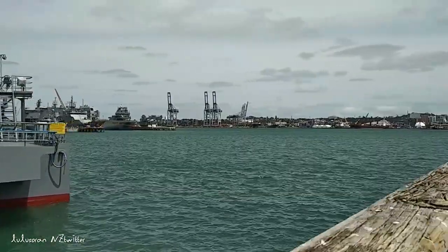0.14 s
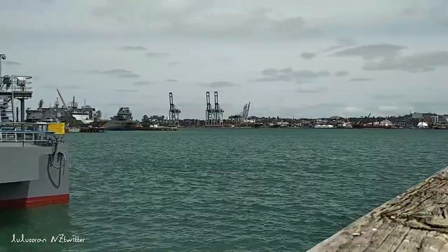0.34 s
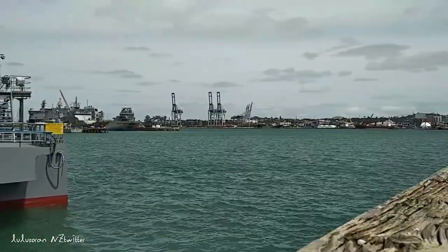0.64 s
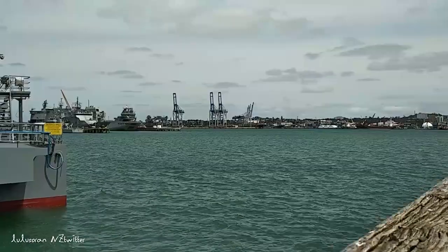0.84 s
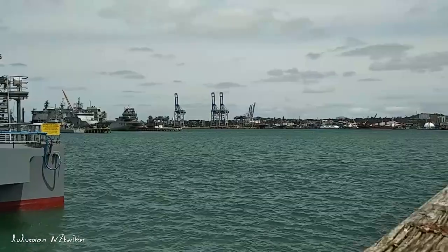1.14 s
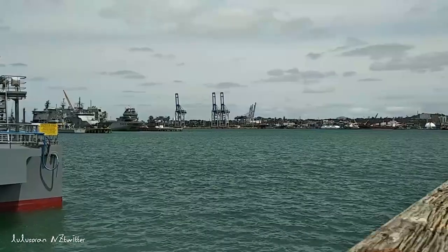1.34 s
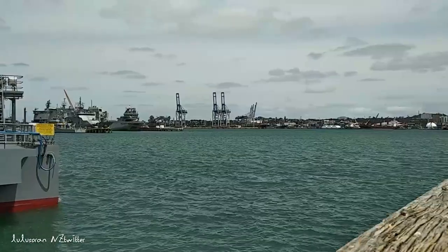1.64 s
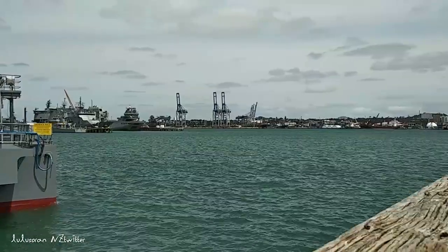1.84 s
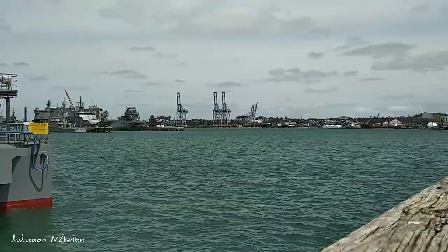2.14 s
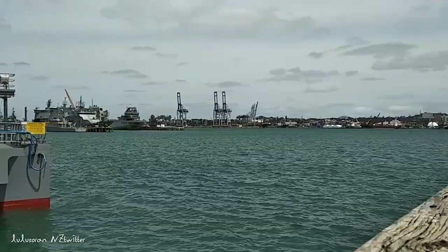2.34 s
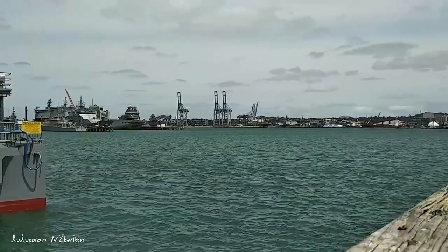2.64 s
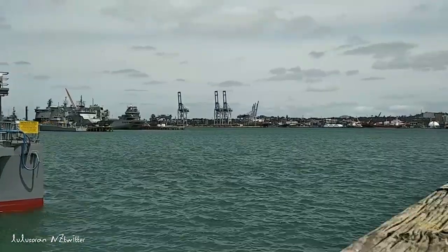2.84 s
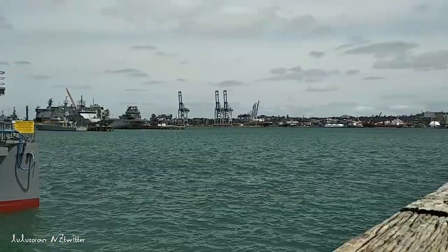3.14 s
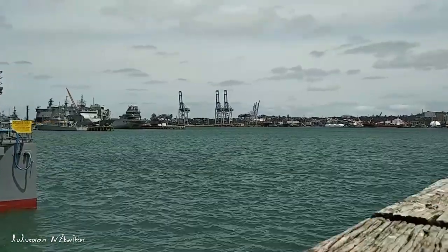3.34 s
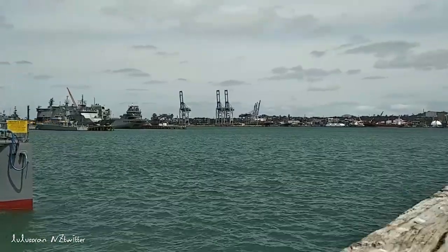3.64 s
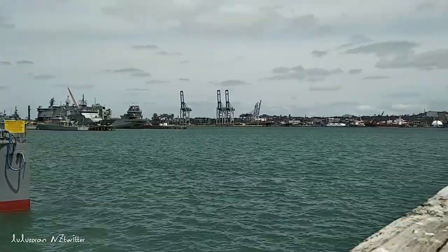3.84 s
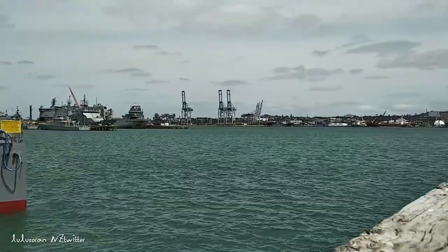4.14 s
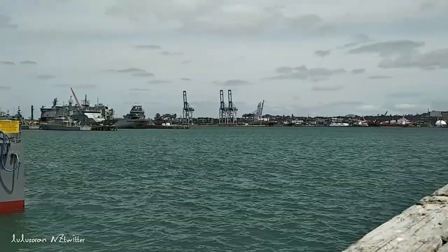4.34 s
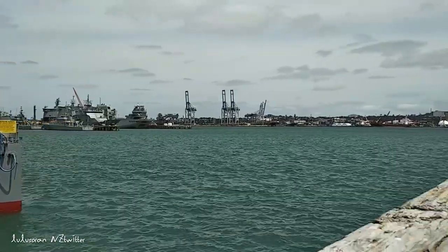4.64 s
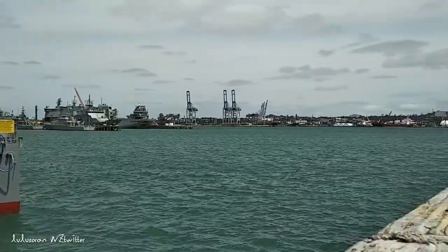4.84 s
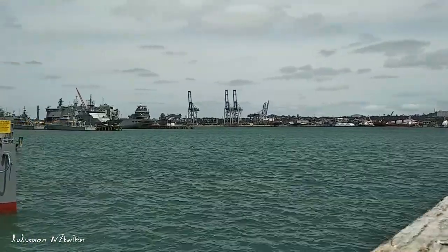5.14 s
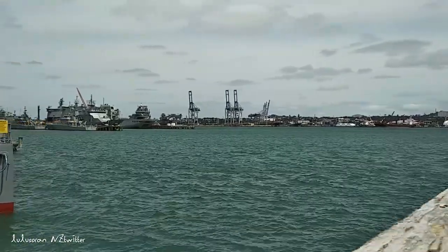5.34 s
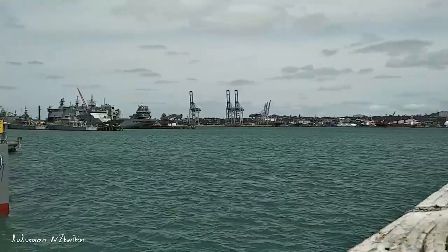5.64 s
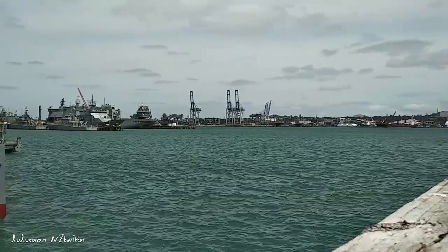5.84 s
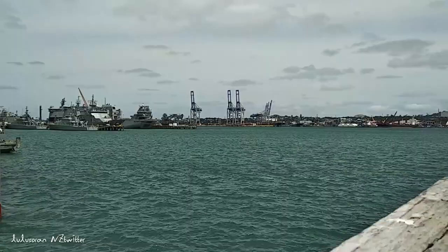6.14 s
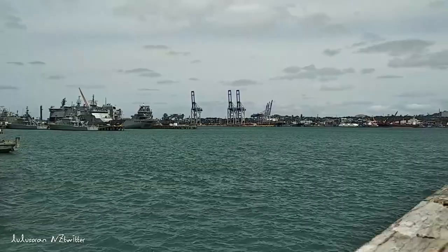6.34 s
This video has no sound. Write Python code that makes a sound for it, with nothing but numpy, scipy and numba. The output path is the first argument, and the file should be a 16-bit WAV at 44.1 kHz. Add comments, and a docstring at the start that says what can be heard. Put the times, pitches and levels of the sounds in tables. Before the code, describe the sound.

Steady, airy water hiss fills a wide outdoor stereo image, swelling slightly now and then. Sparse ticks and splashes come first, with distant sliding whistles beneath. The brightest, loudest slaps arrive past the midpoint, mostly centre to left, frothing briefly afterward. Wood creaks once, hollow water plops and gurgles at far right, and a few clear drips end the scene over unbroken fizz.

```python
"""A fizz of countless bursting bubbles surges now and then and froths after most splashes, as harbour
water laps at a timber wharf. Wavelets knock on the piles, loose water glugs on the right,
timber creaks once, and a far bird whistles. Water sounds are built from single ringing bubbles,
timber from fixed ringing tones, and the bird from sliding sine waves.
A small stereo microphone above the water cuts the bass."""
import sys
import numpy as np
from scipy import signal
from scipy.fft import rfft, irfft, next_fast_len
from scipy.io import wavfile
from scipy.ndimage import map_coordinates
from numba import njit

SR = 44100
rng = np.random.default_rng(int(sys.argv[2]) if len(sys.argv) > 2 else 0)


def volts_from_decibels(level):
    """Turn decibel levels (scalar or array-like) into linear amplitude factors."""
    exponent = np.asarray(level, float) / 20
    return 10 ** exponent


def put_to_file(sound):
    """Save the sound as 16-bit audio at rate SR, in the file named by the first command-line argument."""
    columns = np.atleast_2d(sound).T  # one column per channel
    safe = np.clip(columns, -1, 1)
    whole_steps = np.round(safe * 32767)
    wavfile.write(sys.argv[1], SR, whole_steps.astype(np.int16))


N = 286376  # samples

# Steady fizz, before lean and ripple. Each row: time in seconds, then foam, spray and mist levels in dB.
STEADY_FIZZ = [(0.0, -51, -50.5, -65.5), (0.34, -53.5, -53, -65.5), (2.55, -53.5, -52, -61.5),
               (2.67, -52, -53, -64), (3.61, -53, -52.5, -63.5), (3.76, -51.5, -48.5, -64),
               (3.9, -51.5, -53, -61.5), (4.81, -52, -50.5, -66), (5.28, -54, -54, -67.5),
               (5.75, -51, -49.5, -64), (6.05, -55.5, -54.5, -67.5), (6.49, -51.5, -51.5, -65)]
# Surges that swell and sink. Each row: centre in seconds, half width in seconds, foam dB, spray dB.
SURGES = [(0.135, 0.041, -49.5, -50), (0.553, 0.017, -60, -46.5), (.675, 0.033, -49, -50),
          (2.052, 0.046, -56.5, -47), (2.53, 0.026, -53, -46.5), (3.025, 0.022, -52.5, -51.5),
          (3.28, 0.032, -60, -47), (4.991, 0.028, -52.5, -49.5), (5.831, 0.046, -49, -50.5)]
# Tone of every bubble crowd. Each row: frequency in Hz, gain in dB.
WATER_TONE = [(88, -66), (150, -34), (552, -22), (658, -18.5), (881, -12.5), (1300, -7.5), (1640, -5),
              (2200, 0), (3580, -1), (3870, -1), (4260, -1.5), (5490, -9), (7790, -4.5), (15700, -19)]
# Bubble crowds. Each holds: lowest Hz, highest Hz, bubbles per second,
# cycles a bubble takes to fade by 60 dB, scatter of bubble size in dB.
FOAM = (1050, 5045, 4500, 27.3, 3.2)
SPRAY = (5130, 10650, 6600, 90, 1.4)
MIST = (11000, 15600, 3400, 300, 1.9)  # the finest bubbles
MIXED_BUBBLES = (1800, 13000, 300, 43, 3.2)  # a sparse, faint crowd of mixed pitch beneath the fizz
GURGLE = (370, 1508, 1200, 9.5, 1.1)
GULPS = (90, 269, 500, 5.5, 3.4)
# Soft low gulps under the deck. Each row: start in seconds, level in dB.
GULP_TIMES = [(.053, -73), (.3, -79), (0.519, -70), (.65, -62), (1.06, -76), (1.25, -70), (1.349, -69),
              (1.58, -59), (1.75, -74), (2.21, -71), (2.32, -69), (2.48, -74), (2.89, -70), (3.37, -68),
              (3.61, -64), (4.16, -61), (5.19, -71), (6.0, -71)]
# Splashes, drops and slaps. Each row: time in seconds, relative level in dB, centre in Hz,
# spread in octaves, left minus right in dB.
SPLASHES = [(0.132, -41.5, 4480, 0.19, -10), (0.637, -34, 12700, 0.12, 15.5), (0.64, -39, 2870, 0.16, -1),
            (0.6408, -27, 8000, 0.2, 3.5), (0.9178, -34.5, 7900, 0.1, 2), (0.9436, -34, 4180, 0.086, 1.5),
            (1.2237, -41, 2350, 0.16, 3), (2.254, -36, 9000, 0.089, 16), (2.414, -34, 7520, 0.57, -0.5),
            (2.417, -43, 13400, 0.2, 11), (2.418, -37, 2620, 0.11, 3), (2.507, -32.5, 9000, 0.12, 9),
            (2.549, -36.5, 5080, 0.19, 8), (2.55, -31, 8700, 0.13, 6), (2.6394, -38, 9530, 0.16, 14),
            (2.896, -38.5, 9730, 0.32, 3), (3.128, -34, 8500, 0.41, 0), (3.214, -44.5, 8750, 0.09, 34.5),
            (3.351, -38.5, 8550, 0.18, 7), (3.608, -21, 13200, 0.2, 19), (3.6088, -18.5, 7650, 0.15, 2.5),
            (3.609, -25, 4560, 0.12, 0), (3.61, -36, 2320, 0.18, -1), (3.654, -38, 3060, 0.14, 1),
            (3.757, -38, 11800, 0.21, 13), (3.8446, -31, 8870, 0.15, 10), (3.8537, -33, 11960, 0.34, 15),
            (3.8538, -31, 1920, 0.3, 4), (4.102, -37, 13400, 0.16, 15), (4.1025, -21.5, 8700, 0.18, 12),
            (4.1017, -26.5, 3330, 0.5, 1.5), (4.347, -44, 13550, 0.2, 15.5), (4.348, -28.5, 9070, 0.2, 15),
            (4.3488, -33.5, 1990, 0.26, -19.5), (4.349, -28.5, 3920, 0.27, 10),
            (4.407, -41, 3330, 0.089, 2), (4.602, -48, 1700, 0.34, -6), (4.86, -37.5, 8000, 0.079, 9.5),
            (4.861, -48.5, 1900, 0.18, 2), (5.2728, -39, 8360, 0.06, 10.5), (5.82, -40, 4300, 0.093, -1),
            (5.851, -36, 4300, 0.11, -5), (5.912, -35.5, 4100, 0.13, -2), (6.419, -38.5, 8540, 0.49, 2)]
# Trickles, runs of like-sized bubbles. Each row: start in seconds, end in seconds, level in dB,
# centre in Hz, spread in octaves, left minus right in dB.
TRICKLES = [(0.112, 0.15, -46, 4340, 0.092, 0), (0.114, 0.156, -42, 7260, 0.16, -5),
            (0.661, 0.698, -41, 3570, 0.28, 2), (0.643, .688, -41, 8400, 0.27, 5),
            (3.597, 3.626, -28, 7300, 0.05, 3), (3.6, 3.626, -25.5, 10300, 0.16, 12),
            (3.621, 3.672, -45, 2600, 0.16, 3), (4.165, 4.192, -40, 3100, 0.14, 6),
            (4.237, 4.268, -47, 4030, 0.098, 6), (4.357, 4.436, -46, 4030, 0.46, 2),
            (5.769, 5.889, -38.5, 4200, .07, -1), (5.843, 5.89, -40, 8870, 0.092, 7)]
# Single drops and cracks, one bubble each. Each row: time in seconds, level in dB, pitch in Hz,
# cycles to fade by 60 dB, left minus right in dB.
DROPS = [(.9428, -38, 4000, 30, -4), (2.417, -24, 2800, 8, -2), (2.898, -31, 2150, 30, 8),
         (3.926, -32, 2160, 100, 4), (3.6104, -9.5, 4160, 24, -1), (4.1033, -4.5, 2790, 7.5, 12),
         (4.172, -39, 3100, 40, 6), (4.3495, -19, 1850, 20, 8), (4.3497, -22, 7100, 12, 6),
         (4.738, -29, 4300, 37, -5), (5.799, -31, 2640, 32, -5), (5.818, -28, 3000, 11, -3),
         (5.152, -22, 3940, 24, -7.5), (5.3372, -10.5, 1900, 2.7, -21), (5.381, -24, 1250, 5, -19),
         (5.462, -28, 1200, 5.6, -20), (5.913, -17, 4000, 14, -5), (5.914, -26, 2400, 9.6, -7)]
# Wavelets knocking on the piles. Each row: time in seconds, relative level of the water in dB,
# centre in Hz, level of the ringing timber in dB.
KNOCKS = [(1.224, -54, 625, -71), (1.48, -59, 1210, -71), (2.917, -58.5, 500, -62), (3.854, -44, 950, -43),
          (4.105, -45.5, 1010, -54), (4.347, -39.5, 1046, -45), (4.602, -48, 610, -62),
          (4.86, -51, 620, -64)]
# Tones the piles ring with. Each row: pitch in Hz, level in dB against the ring, time to fade by 60 dB in seconds.
PILE_TONES = [(292, -11, 0.2), (312, -14, .14), (465, -13, .13), (690, -20, 0.12), (1000, -28, 0.09),
              (1260, -28, 0.1)]
# Loose water glugging on the right. Each row: time in seconds, relative level in dB, centre in Hz.
GLUGS = [(5.308, -55, 694), (5.324, -61, 480), (5.336, -46, 900), (5.368, -52, 610), (5.38, -50, 900),
         (5.46, -53.5, 700), (5.478, -55.5, 690), (5.558, -57, 1120), (5.615, -59, 480), (5.676, -58, 1100),
         (5.705, -61.5, 555), (5.746, -57, 630)]
# A short creak of wet timber. It holds: start in seconds, end in seconds, slips per second, base level in dB.
CREAK = (4.644, 4.716, 217, -41)
# Tones of the creak. Each row: pitch in Hz before it sags, relative level in dB, time to fade by 60 dB in seconds.
CREAK_TONES = [(3540, 0, .022), (2290, -5, .02), (1750, -8, .02)]
# Far bird notes. Each row: start in seconds, length in seconds, relative level in dB,
# first pitch in Hz, pitch it slides towards in Hz.
BIRD_NOTES = [(0.18, 0.125, -62, 860, 1350), (0.342, 0.08, -61, 1320, 1295), (0.625, 0.08, -60, 1310, 1400),
              (.7, .065, -62, 1330, 1410), (.755, .165, -67, 1410, 1385), (1.27, 0.082, -72, 1360, 1390)]

EAR_GAP_S = 0.00043  # travel time from one microphone to the other
FIZZ_LEAN_DB = (-0.5, 1, 6)  # left minus right of foam, spray, mist
RIPPLE_DB = 1  # foam, spray and mist liven and calm together by about this much
SURGE_MIST_DB = -11.5  # mist in a surge, against the spray
FROTH_DB, FROTH_S = (-20.5, -24, -39), 0.034  # foam, spray, mist against the splash; time to sink to 1 / e
MIXED_DB, GURGLE_DB, GULP_DB = -67, -69.5, -92  # steady levels
STIR_DB, STIR_S = -11.5, 0.02  # gurgle left by a knock, against it; time to sink to 1 / e
GLUG_GULP_DB, GULP_S = -15, 0.024  # gulps left by a glug, against it; time to sink to 1 / e
# Finer splash bubbles ring for more cycles and fly further ahead: values at 4 kHz, and powers of pitch.
SPLASH_CYCLES, CYCLES_POWER, SPLASH_LEAD, LEAD_POWER = 31.4, 0.53, 0.031, 1.2
SPLASH_T60_S, KNOCK_T60_S, GLUG_T60_S = 0.089, 0.081, 0.06  # time for a burst to thin out by 60 dB
KNOCK_OCTAVES, GLUG_OCTAVES = 0.466, 0.55  # spread of pitch
GLUG_PAN_DB = -25.5  # left minus right
TRICKLE_CYCLES = 44  # at 4 kHz
CREAK_SAG = 0.049  # share by which the pitch falls
SLIDE_S, NOTE_FADE_DB_PER_S, FLAT_DB_PER_OCTAVE = 0.038, 25, 17  # bird: slide time, fade, softness while flat
BASS_CUT_HZ, TOP_HZ = 613, 15800


@njit
def bubbles(start, hz, t60, glide, size, lag, pan, length):
    """Each bubble swells within a cycle, then dies as a gliding tone; the left side gets it lag samples late."""
    out = np.zeros((2, length))
    for k in range(len(start)):
        tone = size[k] + 0j
        turn = 2 * np.pi * hz[k] / SR
        fade = np.exp(-np.log(1000) / (t60[k] * SR))
        swell = np.exp(-hz[k] / SR)
        rest = 1.  # the part of the swell still to come
        steps = int(t60[k] * SR * .7)
        spin = fade * np.exp(1j * turn)
        bend = np.exp(1j * turn * glide / steps)
        for i in range(steps):
            tone *= spin
            spin *= bend
            rest *= swell
            value = tone.imag * (1 - rest) ** 2
            left, right = start[k] + lag[k] + i, start[k] + i
            if 0 <= left < length and 0 <= right < length:
                out[0, left] += value * pan[k]
                out[1, right] += value / pan[k]
    return out


def play(s, hz, cycles, size, place, pan_db, glide=0.14):
    """Turns place (-1 left, 1 right) into a delay between the sides, and sounds bubbles that glide in pitch."""
    hz = np.clip(hz, 60, .42 * SR)
    lag = np.round(place * EAR_GAP_S * SR).astype(int)
    return bubbles((s * SR).astype(int), hz, cycles / hz, glide, size, lag, volts_from_decibels(pan_db / 2), N)


def play_rows(*columns, glide=0.14):
    """Stretches the columns given to play() to one shape and sounds every bubble in them."""
    flat = [column.ravel() for column in np.broadcast_arrays(*columns)]
    return play(*flat, glide=glide)


def colour(x, points):
    """Shapes a sound by its spectrum, with gains drawn between (Hz, dB) points."""
    size = next_fast_len(N)
    hz, db = np.transpose(points)
    gain = volts_from_decibels(np.interp(np.log(np.fft.rfftfreq(size, 1 / SR) + 1), np.log(hz), db))
    return irfft(rfft(x, size) * gain, size)[..., :N]


def patches(when, pitch, per_s=22.0, bands=11):
    """Small patches of water liven and calm on their own, each for a moment and a narrow range of pitch."""
    field = rng.standard_normal((int(per_s * N / SR) + 1, bands))
    return map_coordinates(field, [when * (len(field) - 1), pitch * (bands - 1)], order=1)


def crowd(low_hz, high_hz, rate, cycles, scatter_db):
    """A crowd of bubbles at level 0 dB; some come from the water on the right, the rest from all round."""
    count = int(rate * N / SR)
    when, pitch, side, place = rng.random((count, 4)).T  # all from 0 to 1
    hz = low_hz * (high_hz / low_hz) ** pitch
    size_db = scatter_db * rng.standard_normal(count) + 3.5 * patches(when, pitch)
    from_right = side < 0.4
    place = np.where(from_right, 1 + 0.25 * (place - .5), 3 * (place - .5))
    sound = play(when * N / SR, hz, cycles, hz * volts_from_decibels(size_db), place, 0 * hz)
    sound = colour(sound, WATER_TONE)
    return sound / np.sqrt(np.mean(sound.mean(0) ** 2))


def lingering(s, db, decay_s):
    """Power that events leave behind, sinking exponentially."""
    age = np.arange(N) / SR - np.asarray(s)[:, None]
    sinking = np.where(age > 0, np.exp(-np.abs(age) / decay_s), 0)
    return volts_from_decibels(db) ** 2 @ sinking


def fizz():
    """Crowds of bubbles: foam, spray and mist surge and froth after splashes; knocks and glugs stir low ones."""
    t = np.arange(N) / SR
    s, *steady_db = np.transpose(STEADY_FIZZ)
    centre, width, foam_db, spray_db = np.transpose(SURGES)
    surge_db = (foam_db, spray_db, spray_db + SURGE_MIST_DB)
    swell = np.exp(-((t - centre[:, None]) / width[:, None]) ** 2)
    hit, hit_db, hit_hz, _, pan_db = np.transpose(SPLASHES)
    sides = np.array([[.5], [-.5]])  # half of a level difference to each side
    ripple = volts_from_decibels(RIPPLE_DB * patches(t * SR / N, 0 * t, per_s=14.0))
    out = volts_from_decibels(MIXED_DB) * crowd(*MIXED_BUBBLES)
    for i, kind in enumerate((FOAM, SPRAY, MIST)):
        calm = volts_from_decibels(np.interp(t, s, steady_db[i])) ** 2 + volts_from_decibels(surge_db[i]) ** 2 @ swell
        calm = calm * volts_from_decibels(sides * FIZZ_LEAN_DB[i]) ** 2
        # a splash leaves froth only in the crowd that holds its pitch
        own = (kind[0] <= hit_hz) & (hit_hz < kind[1])
        left_db = hit_db + FROTH_DB[i] + sides * pan_db
        froth = lingering(hit[own], left_db[:, own], FROTH_S)
        out = out + crowd(*kind) * np.sqrt(calm * ripple ** 2 + froth)
    return out + gurgle() + gulps(sides)


def gurgle():
    """A faint crowd of larger bubbles, stirred up for a moment by each knock."""
    knock, knock_db, *_ = np.transpose(KNOCKS)
    power = volts_from_decibels(GURGLE_DB) ** 2 + lingering(knock, knock_db + STIR_DB, STIR_S)
    return crowd(*GURGLE) * np.sqrt(power)


def gulps(sides):
    """The largest, lowest bubbles, which swell under the deck and after each glug."""
    glug, glug_db, _ = np.transpose(GLUGS)
    power = volts_from_decibels(GULP_DB) ** 2 + lingering(glug, glug_db + GLUG_GULP_DB + sides * GLUG_PAN_DB, GULP_S)
    power = power + lingering(*np.transpose(GULP_TIMES), GULP_S)
    return crowd(*GULPS) * np.sqrt(power)


def bursts(s, peak_db, hz, octaves, t60, pan_db, count, cycles, lead, place, spread):
    """Every event is a cloud of bubbles: a weak few ahead of the blow, a thick head, a thinning tail."""
    late, pitch, where, size = np.moveaxis(rng.standard_normal((len(s), count, 4)), -1, 0)
    late = late + .7  # most bubbles follow the blow
    after = t60 * np.where(late > 0, 0.14 * np.abs(late) ** 1.3, lead * late)
    db = peak_db - 60 * np.abs(after) / t60 - 5 * (after < 0) + 3 * size
    return play_rows(s + after, hz * 2 ** (octaves * pitch), cycles, volts_from_decibels(db), place + spread * where, pan_db)


def splashes():
    """Clouds of fine bubbles, reaching the left side first for the most part."""
    s, db, hz, octaves, pan_db = np.transpose(SPLASHES)[:, :, None]
    cycles = SPLASH_CYCLES * (hz / 4000) ** CYCLES_POWER
    lead = SPLASH_LEAD * (hz / 4000) ** LEAD_POWER
    return bursts(s, db - 2.5, hz, octaves, SPLASH_T60_S, pan_db, count=150, cycles=cycles,
                  lead=lead, place=-1.1, spread=.42)


def trickles():
    """Bubbles of like size spread evenly over a moment, softer at both ends."""
    start, end, db, hz, octaves, pan_db = np.transpose(TRICKLES)[:, :, None]
    pitch, where, size = np.moveaxis(rng.standard_normal((len(start), 90, 3)), -1, 0)
    when = rng.random(pitch.shape)
    cycles = TRICKLE_CYCLES * (hz / 4000) ** CYCLES_POWER
    loudness = volts_from_decibels(db + 4.1 * size) * np.sqrt(np.sin(np.pi * when))
    return play_rows(start + (end - start) * when, hz * 2 ** (octaves * pitch), cycles,
                     loudness, -1.0 + .4 * where, pan_db)


def drops():
    """Lone ringing bubbles that stand out of the fizz."""
    s, db, hz, cycles, pan_db = np.transpose(DROPS)
    return play(s, hz, cycles, volts_from_decibels(db), -.9 + 0 * s, pan_db)


def ring(s, db, modes, place, detune, scatter_db, tuning):
    """Blows at the given times set a few fixed tones ringing, each a little differently every time."""
    hz, mode_db, t60 = np.transpose(modes)
    chance = rng.standard_normal((len(s), len(hz), 2))
    pitch = hz * (tuning + detune * chance[..., 0])
    level_db = db[:, None] + mode_db + scatter_db * chance[..., 1]
    return play_rows(s[:, None], pitch, hz * t60, volts_from_decibels(level_db), place, 0., glide=0.)


def knocks():
    """Wavelets make big short bubbles at the piles, and the struck timber rings."""
    s, db, hz, ring_db = np.transpose(KNOCKS)[:, :, None]
    water = bursts(s, db + 7.0, hz, KNOCK_OCTAVES, KNOCK_T60_S, 0., count=16, cycles=10.3,
                   lead=0.011, place=-0.099, spread=0.39)
    timber = ring(s[:, 0], ring_db[:, 0], PILE_TONES, place=-.3, detune=0.028, scatter_db=6.5, tuning=1)
    return water + timber


def glugs():
    """Loose water makes big short bubbles close on the right."""
    s, db, hz = np.transpose(GLUGS)[:, :, None]
    return bursts(s, db + 10.0, hz, GLUG_OCTAVES, GLUG_T60_S, GLUG_PAN_DB, count=14, cycles=6.4,
                  lead=.015, place=.3, spread=0.63)


def creak():
    """Evenly timed slips of the timber set it ringing; they swell and sink while the pitch sags."""
    start, end, rate, db = CREAK
    s = np.arange(start, end, 1 / rate)
    rise = (s - start) / (end - start)
    slip_db = db + 7 * np.sin(np.pi * rise ** 1.4)
    return ring(s, slip_db, CREAK_TONES, place=0.88, detune=0.0026, scatter_db=3.0,
                tuning=1 - CREAK_SAG * rise[:, None])


def bird():
    """Faint whistled notes from the right: sine waves that slide, fade and flutter in level and pitch."""
    t, out = np.arange(N) / SR, 0
    flutter_db = 3.5 * patches(t * SR / N, 0 * t, per_s=90.0)
    for start, length, db, first_hz, settled_hz in BIRD_NOTES:
        age = np.clip(t - start, 0, length)
        hz = settled_hz - (settled_hz - first_hz) * np.exp(-age / SLIDE_S)
        hz = hz + 3 * flutter_db  # 3 Hz for each dB
        edges = np.clip(np.minimum(age, length - age) / 0.011, 0, 1)
        flat_db = FLAT_DB_PER_OCTAVE * np.log2(settled_hz / hz)
        level_db = db - NOTE_FADE_DB_PER_S * age - flat_db + flutter_db
        whistle = np.sqrt(2) * np.sin(2 * np.pi * np.cumsum(hz) / SR)
        out = out + edges * volts_from_decibels(level_db) * whistle
    left = volts_from_decibels(0.5) * np.roll(out, int(EAR_GAP_S * SR))  # reached later
    return np.array([left, volts_from_decibels(10.5) * out])


def scene():
    """Adds up the water, its events, the timber and the bird."""
    return fizz() + splashes() + trickles() + drops() + knocks() + glugs() + creak() + bird()


def low_pass(x):
    """Removes everything above the highest recorded frequency."""
    return signal.sosfilt(signal.butter(12, 15600, fs=SR, output="sos"), x)


def record(dry):
    """The microphone cuts the bass gently and the very top steeply."""
    bass_cut = signal.butter(3, BASS_CUT_HZ, "high", fs=SR, output="sos")
    top_cut = signal.ellip(8, .3, 70, TOP_HZ, fs=SR, output="sos")
    thin = signal.sosfilt(bass_cut, dry)
    mix = signal.sosfilt(top_cut, thin)
    return low_pass(mix)


dry = scene()
out = record(dry)
put_to_file(out)
```